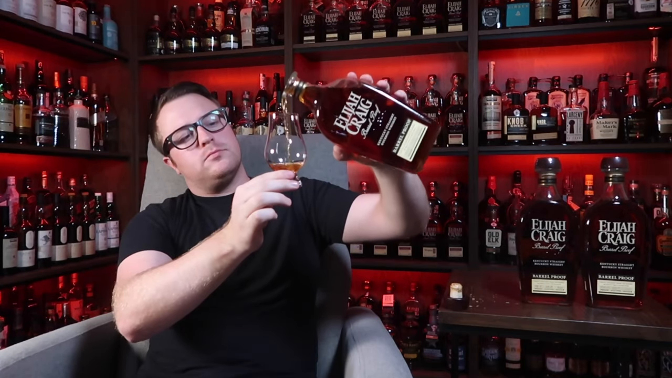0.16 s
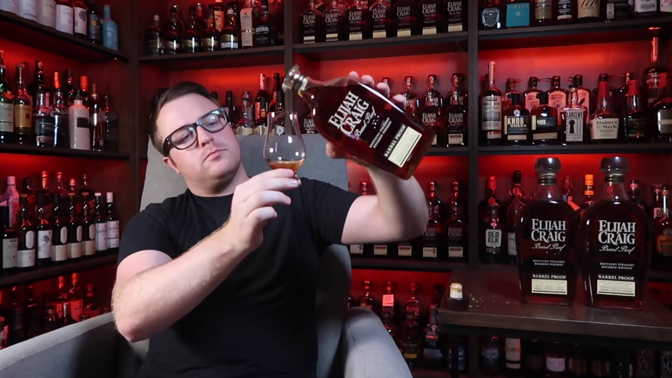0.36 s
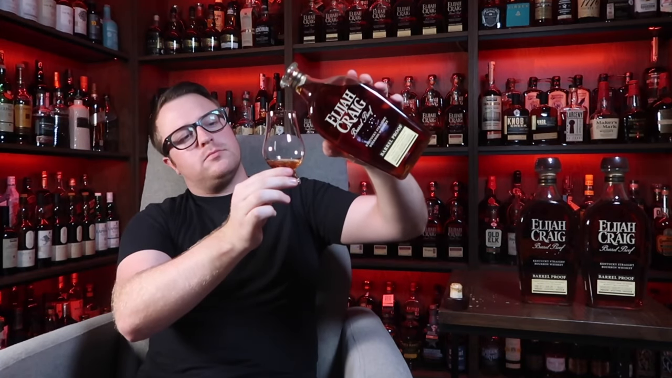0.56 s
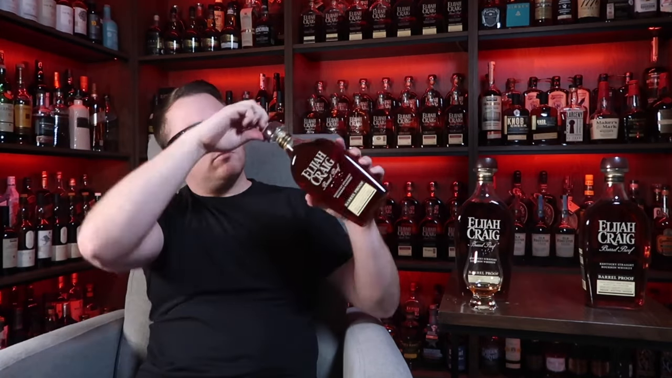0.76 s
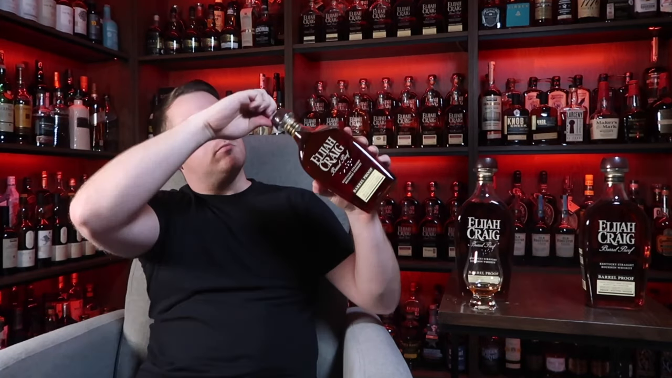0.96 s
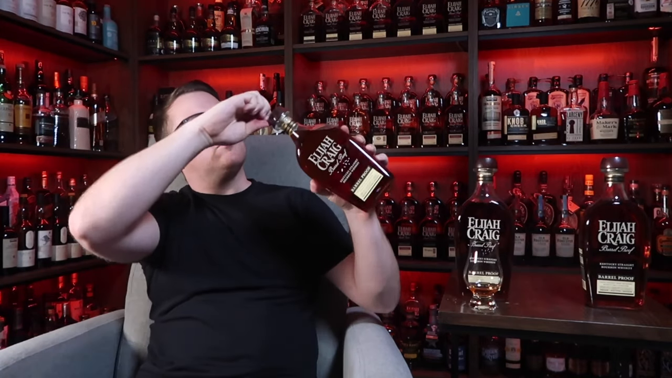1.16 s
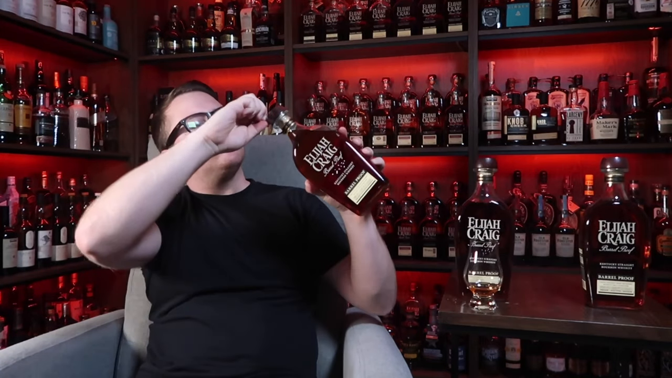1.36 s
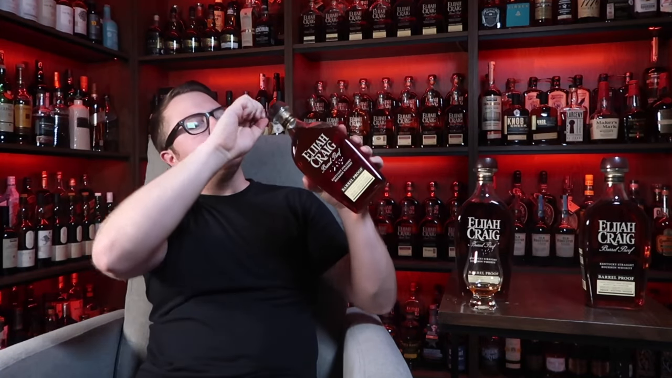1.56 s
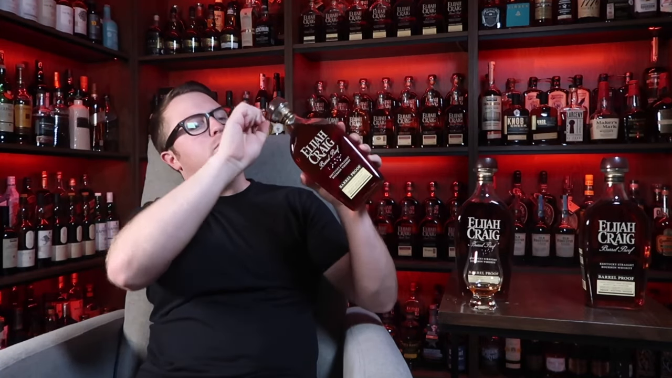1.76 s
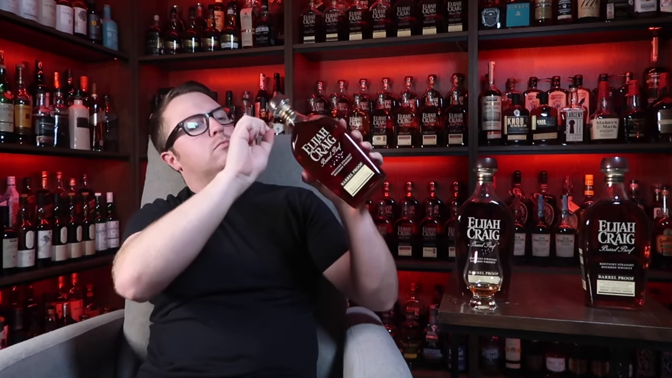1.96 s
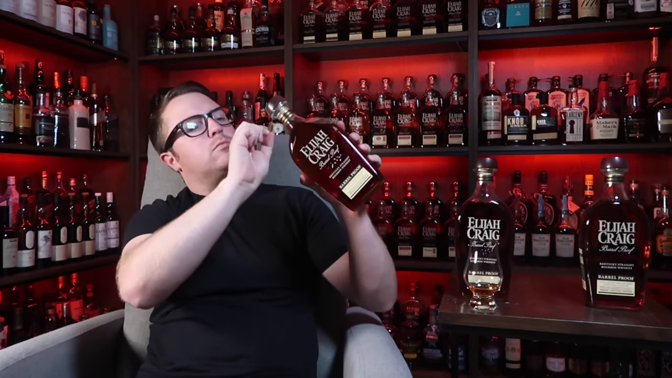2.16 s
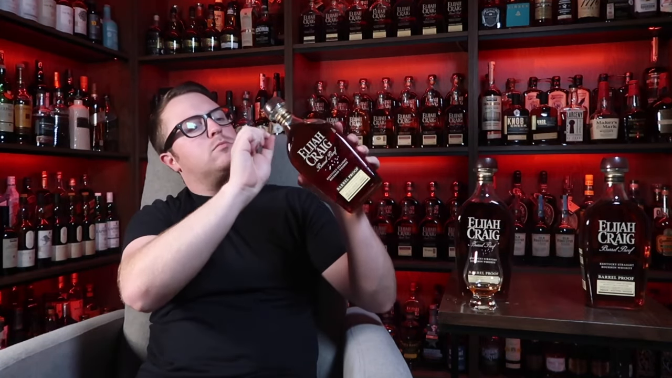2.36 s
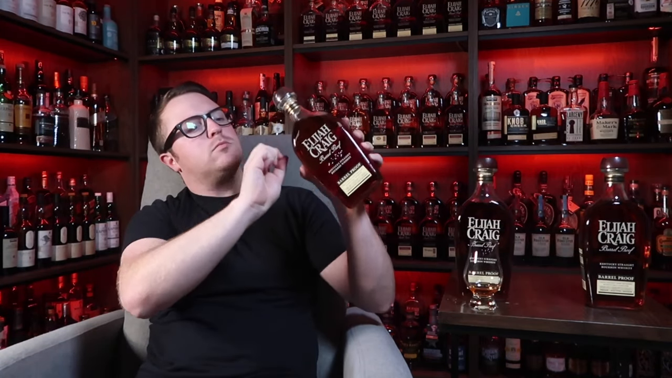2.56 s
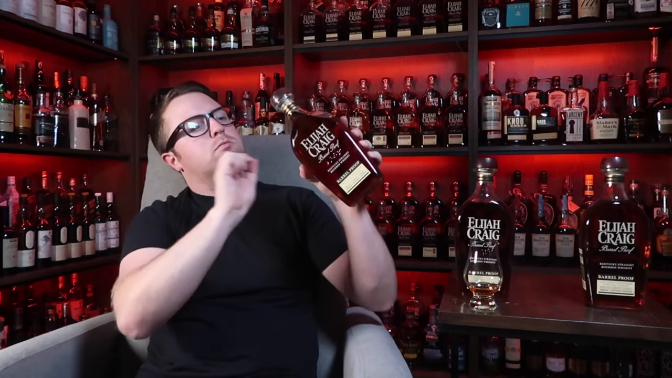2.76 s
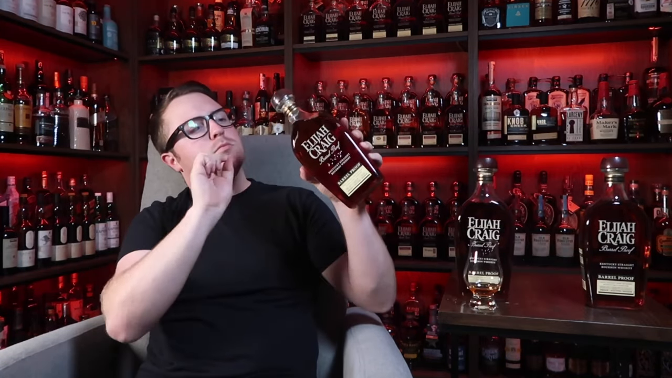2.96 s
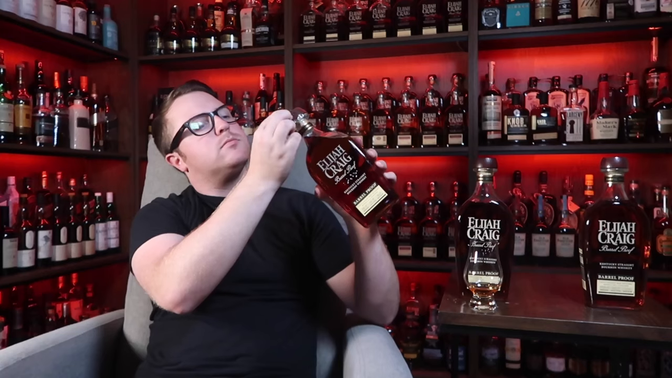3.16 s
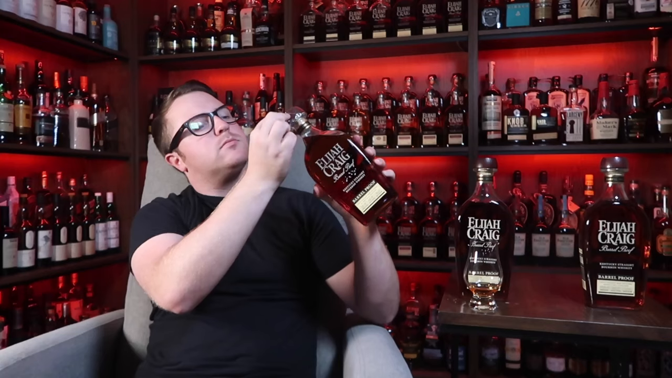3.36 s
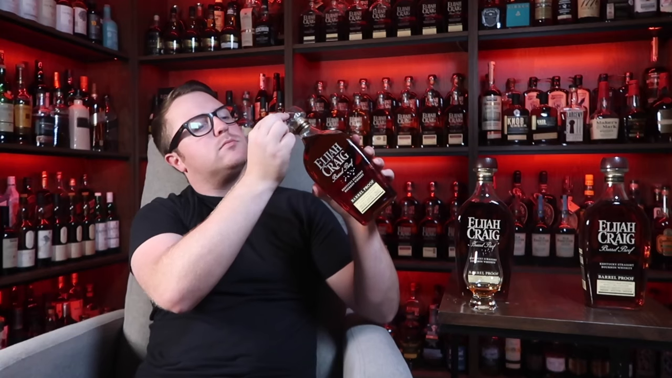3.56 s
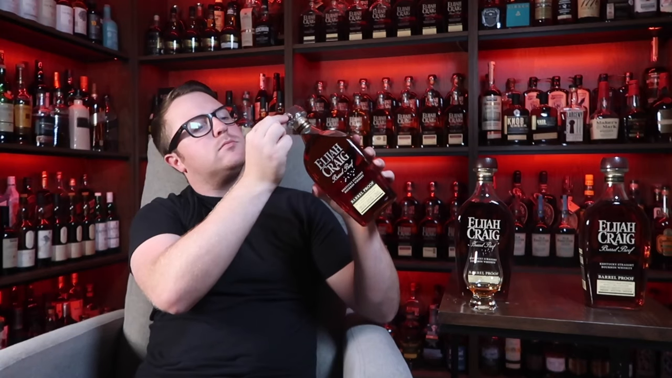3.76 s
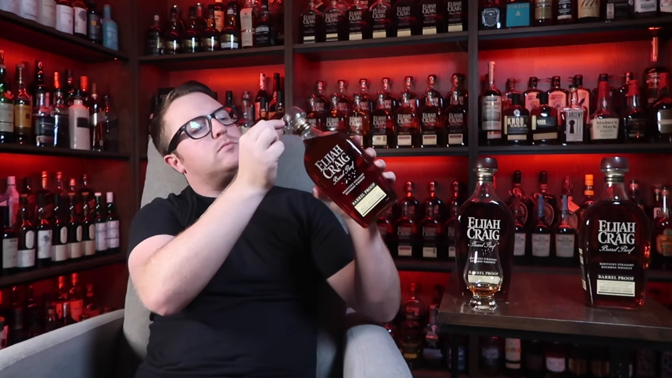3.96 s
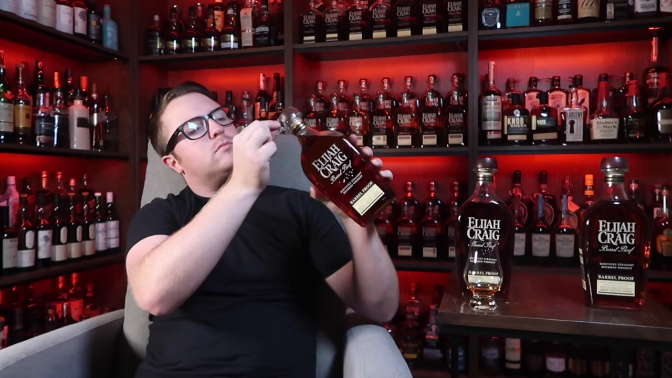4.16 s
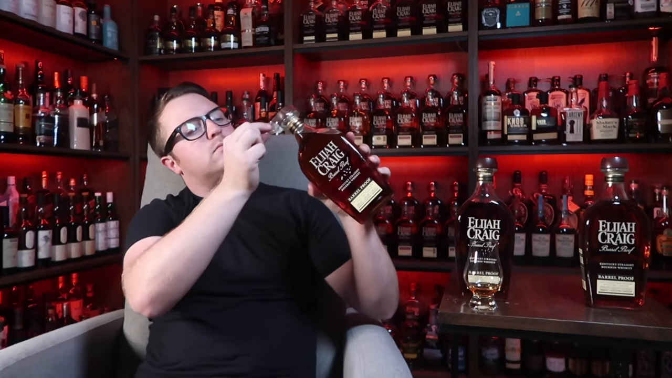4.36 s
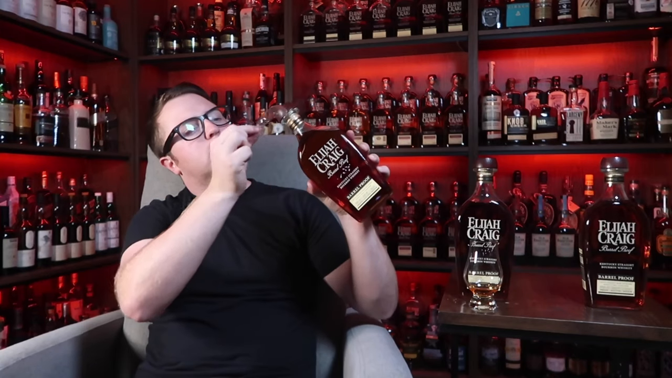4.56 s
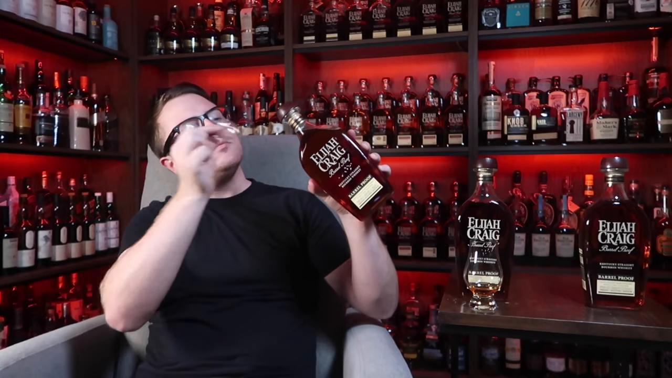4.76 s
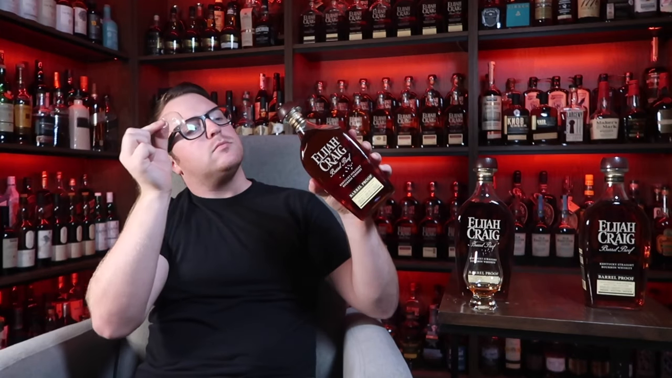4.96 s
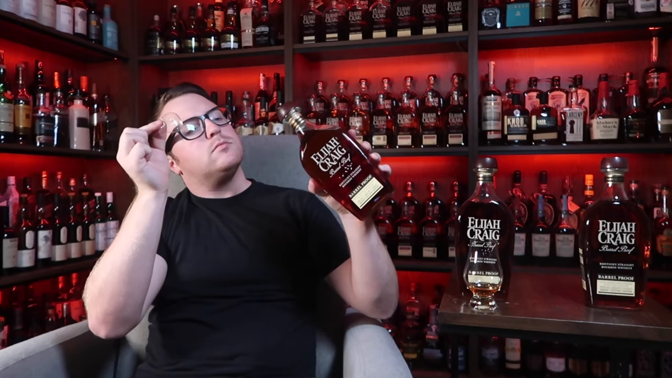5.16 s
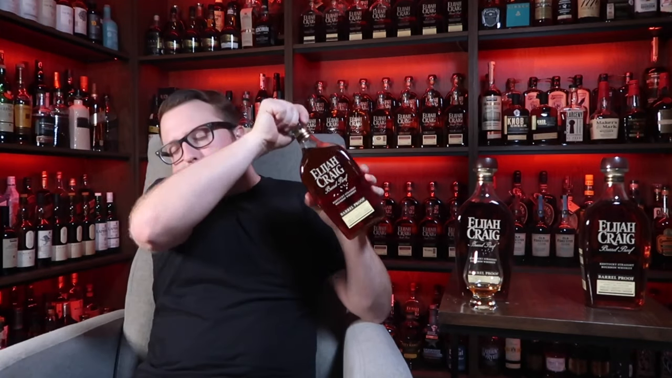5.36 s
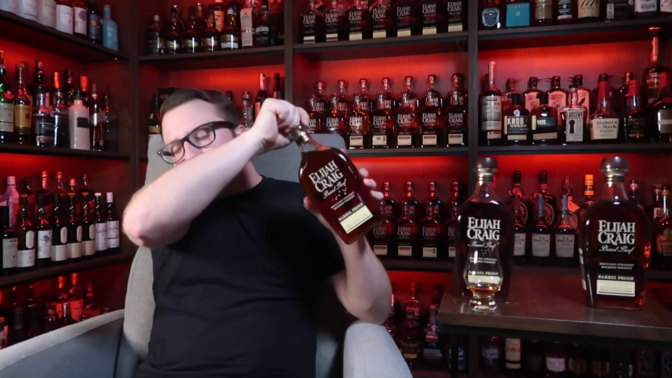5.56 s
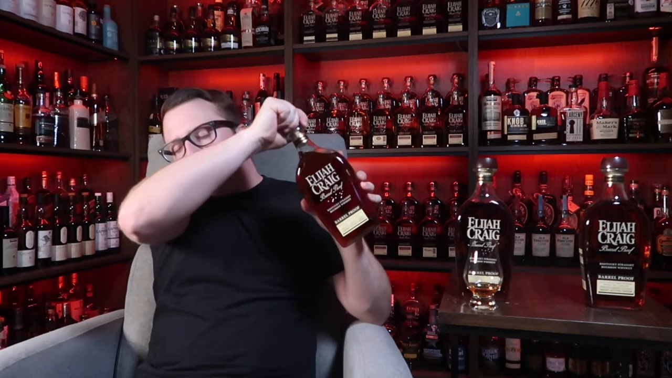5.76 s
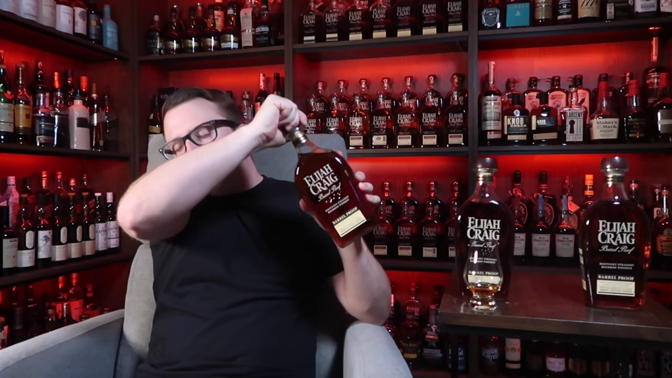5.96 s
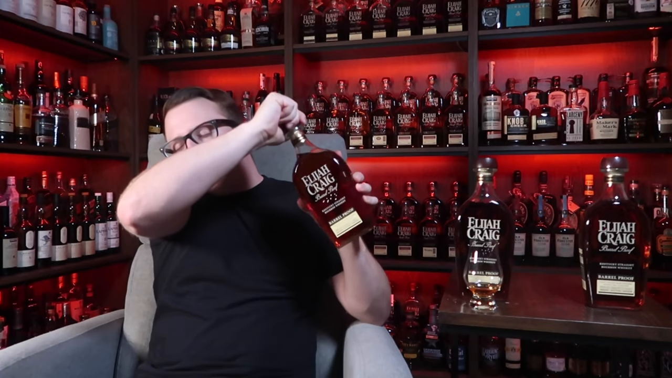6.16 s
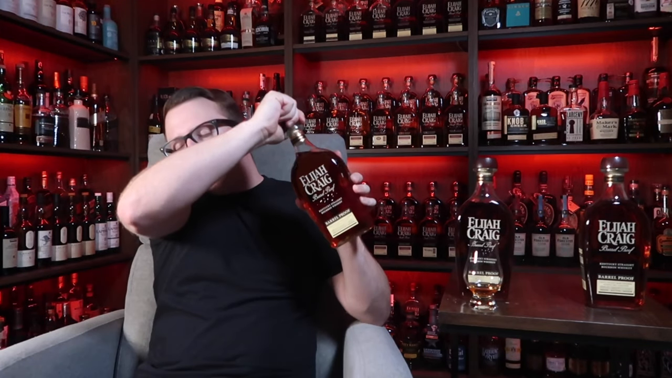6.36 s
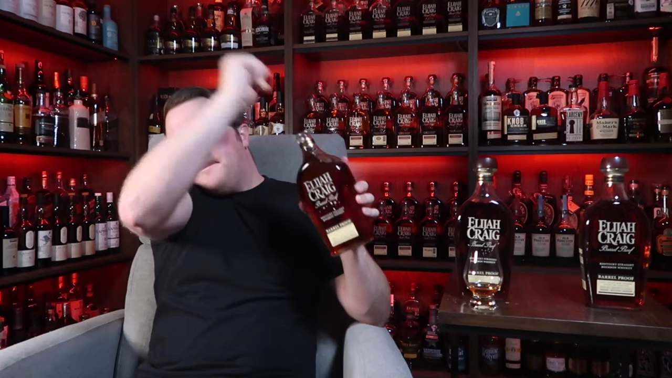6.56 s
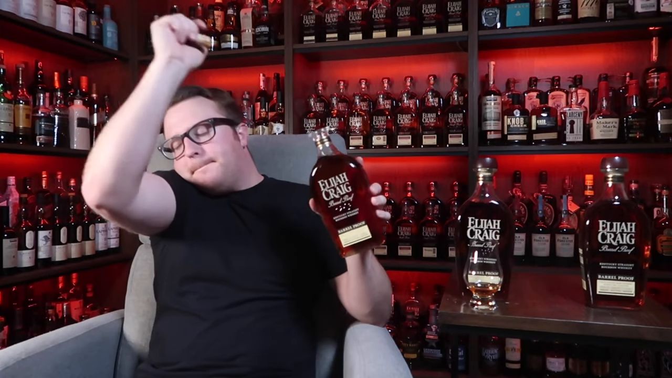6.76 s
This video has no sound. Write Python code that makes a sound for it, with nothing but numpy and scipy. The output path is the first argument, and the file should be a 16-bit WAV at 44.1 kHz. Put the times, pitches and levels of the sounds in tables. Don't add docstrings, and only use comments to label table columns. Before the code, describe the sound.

Quiet indoor close-up with low rumble and soft hiss. A thin stream ends in small glugs and bright drips. Sharp dry snaps of stiff film come in clusters, ending in a hard crack that rings the bottle. A softer seal then tears in quickening crackles. After near-silence, a cork leaves a bottle neck with one loud, round pop and a tiny glug.

```python
import sys
import numpy as np
from scipy import signal
from scipy.fft import rfft, irfft, next_fast_len
from scipy.io import wavfile

SR = 44100
rng = np.random.default_rng(int(sys.argv[2]) if len(sys.argv) > 2 else 0)


def dump(signal):
    limited = np.clip(np.atleast_2d(signal).T, -1, 1)
    pcm = np.round(limited * 32767).astype(np.int16)
    wavfile.write(sys.argv[1], SR, pcm)


def how_loud(loudness_db):
    steps = np.asarray(loudness_db, float) / 20
    return 10 ** steps


N = 299880

# [start_s, pitch_hz, level_db]
NECK_TONE = [
    (6.5651, 758, -26),
    (6.578, 824, -17),
    (6.594, 820, -23.5),
    (6.603, 800, -35.5),
    (6.65, 830, -41.5),
    (6.72, 825, -69),
    (6.8, 800, -84),
]
CORK_SLIDE_S = 0.005


def at_hz(points, hz):
    table_hz, values = np.transpose(points)
    return np.interp(np.log(np.maximum(hz, 1)), np.log(table_hz), values)


def coloured(x, *spectra):
    size = next_fast_len(len(x) + 4096)
    hz = np.arange(size // 2 + 1) * SR / size
    gain = how_loud(sum(at_hz(s, hz) for s in spectra))
    return irfft(rfft(x, size) * gain, size)[:len(x)]


def filtered(x, order, hz, kind="low"):
    return signal.sosfilt(signal.butter(order, hz, kind, fs=SR, output="sos"), x)


def rms_one(x):
    return x / np.sqrt(np.mean(x ** 2) + 1e-20)


def ring(hz, t60, glide=0.):
    t60 = max(t60, 1e-3)
    t = np.arange(int(t60 * SR) + 8) / SR
    envelope = (1 - np.exp(-5 * hz * t)) * how_loud(-60 * t / t60)
    return envelope * np.sin(2 * np.pi * hz * t * (1 + glide * t / t60))


def add(out, s, sound):
    i = max(round(s * SR), 0)
    out[i:i + len(sound)] += sound[:len(out) - i]


def in_time(rows, edge_s=.003):
    s, *columns = np.transpose(rows)
    t = np.arange(N) / SR
    window = np.interp(t, [s[0] - edge_s, s[0], s[-1], s[-1] + edge_s], [0, 1, 1, 0])
    return [np.interp(t, s, c) for c in columns], window


def grains(per_s, spread_db):
    sizes = how_loud(spread_db * np.minimum(rng.exponential(1, N), 4)) * rng.choice([-1, 1], N)
    return sizes * (rng.random(N) < per_s / SR)


def snaps():
    # [start_s, peak_db, pitch_hz]
    brittle_seal = [(0.9786, -34.4, 4020), (1.1517, -55, 5020), (1.1656, -49.2, 3640),
                    (1.1928, -45.9, 3710), (1.2299, -26.8, 3050), (1.379, -24.9, 2760),
                    (1.5903, -27.5, 2950), (1.6543, -46.6, 3500), (1.7621, -40.8, 1970),
                    (1.7964, -19.7, 2890), (1.8109, -20.5, 2920), (1.822, -27.4, 3130),
                    (1.8309, -27.7, 3450), (1.8377, -21.1, 2970), (1.8457, -27.7, 3060),
                    (1.8534, -26.1, 2150), (1.8614, -24.9, 4330), (1.8718, -28.9, 2660),
                    (1.8809, -31.2, 2850), (1.9748, -35.5, 4790), (2.3733, -32.7, 3740),
                    (2.4224, -26.1, 3730), (2.4395, -12.0, 2920), (3.0773, -36, 3900)]
    # [start_s, peak_db, pitch_hz]
    soft_seal = [(3.8373, -36.5, 4180), (3.8918, -38.0, 3380), (3.9019, -40.5, 2780), (3.9627, -23.6, 3920),
                 (4.1046, -48.3, 4850), (4.1895, -51.2, 3980), (4.2621, -39.2, 3220), (4.2867, -26.8, 3410),
                 (4.2922, -29.2, 2640), (4.3118, -22.6, 3740), (4.3463, -32.2, 2920), (4.3528, -28.9, 3330),
                 (4.358, -24.6, 3270), (4.3867, -32.4, 3900), (4.4554, -27.9, 2660), (4.4887, -28.2, 3320),
                 (4.4902, -25.5, 4090), (4.5467, -23.3, 3730), (4.572, -28.0, 4140), (4.6044, -29.3, 3750),
                 (4.6697, -28.1, 2960), (4.6821, -18.7, 3070), (4.6952, -28.0, 4030), (4.7214, -13.4, 2310),
                 (4.731, -18.5, 3110), (4.7389, -22.8, 3830), (6.7153, -50, 7400)]
    ring_cycles = [8.0, 20.2]
    # [start_s, crack_re_ring_db]
    tautness = [(.98, -12), (1.25, -18), (1.4, -18.5), (1.8, -25), (1.97, -14), (2.38, -16), (2.44, -29),
                (3.08, -10), (3.85, -43.5), (3.96, -15.5), (4.2, -18), (4.28, -30.5), (4.5, -39.5),
                (4.57, -37.5), (4.74, -19)]
    out = np.zeros(N)
    tick = np.arange(40)
    for breaks, cycles in zip([brittle_seal, soft_seal], ring_cycles):
        for s, db, hz in breaks:
            snap, crack = np.zeros((2, SR // 20))
            noise = rng.standard_normal(len(tick))
            add(crack, 0, (0.9 + noise) * how_loud(-4.5 * tick) * (-1) ** tick)
            crack = filtered(crack, 1, [2500, 12000], "band")
            add(snap, 0, ring(hz, 0.38 * cycles / hz))
            snap = filtered(snap, 2, 0.67 * hz, "high")
            snap = snap / np.abs(snap).max()
            crack_db = np.interp(s, *np.transpose(tautness)) + 31.0
            peak_s = np.abs(snap).argmax() / SR
            add(out, s - peak_s, how_loud(db - 2.0) * (snap + how_loud(crack_db) * crack))
    return out


def film_crackle():
    # [pitch_hz, level_db]
    film_colour = [(180, -33), (300, -7), (930, -4), (1100, 1), (1190, -3.5), (2070, 1.5), (3890, 8),
                   (7200, -3.5), (14700, -7), (16000, -85)]
    patch_cycles, patch_db = 12.0, -18.5
    clicks = grains(per_s=1000, spread_db=5.5)
    dealt = rng.integers(0, 10, N)
    out = clicks.copy()
    for k, hz in enumerate(np.geomspace(1700, 6000, 10)):
        r = how_loud(-60 * hz / patch_cycles / SR)
        w = 2 * np.pi * hz / SR
        struck = clicks * (dealt == k) + 1e-18
        out += how_loud(patch_db) * signal.lfilter([0, np.sin(w)], [1, -2 * r * np.cos(w), r * r], struck)
    return rms_one(coloured(out, film_colour))


def tearing():
    # [start_s, length_s, crackle_db, fade_over_pull_db, brightness_db]
    short_pulls = [
        (1.14, .095, -100, 30, 17),
        (1.773, 0.11, -62, 0.5, 18),
        (1.96, .028, -68, 13.5, -1.5),
        (2.372, .09, -77, -1.5, -5),
        (3.057, 0.042, -57, -27, 8.5),
        (3.774, .15, -63, 13, -3),
        (4.057, 0.12, -74, 2, 12),
        (6.705, 0.048, -62.5, -25.5, 7),
    ]
    # [start_s, crackle_db, brightness_db]
    long_tear = [
        (4.28, -54, -2),
        (4.336, -45, 3),
        (4.44, -47.5, -14),
        (4.55, -41.5, 7),
        (4.655, -43, -0.5),
        (4.69, -38, 5),
        (4.745, -36.5, 5.5),
        (4.8, -58, 12.5),
        (5.02, -72, -14),
    ]
    crackle = film_crackle()
    top = filtered(crackle, 2, 6000, "high")
    pulls = [[(s, db, bright), (s + length_s, db + fade_db, bright)]
             for s, length_s, db, fade_db, bright in short_pulls]
    out = np.zeros(N)
    for rows in pulls + [long_tear]:
        (db, bright_db), window = in_time(rows)
        extra_top = how_loud(np.minimum(bright_db, 18)) - 1
        out += window * how_loud(db - 6.0) * (crackle + extra_top * top)
    return out


def nail_taps():
    # [pitch_hz, level_db, t60_s]
    neck_wall = [(2218, -1, 0.077), (3400, -12, 0.014), (4260, -1, .02)]
    # [pitch_hz, level_db, t60_s]
    rim = [(2610, 0.71, 0.17)]
    # [pitch_hz, level_db, t60_s]
    cap = [(298, -25, 0.027), (475, -51, 0.028), (765, -17, 0.02), (1200, -12, 0.022), (1970, 12, 0.0029)]
    # [pitch_hz, level_db, t60_s]
    shoulder = [(1352, -6, 0.063), (1553, -4.5, 0.037), (5100, 8.5, 0.013), (5600, 1, 0.012)]
    # [start_s, wall_db, rim_db, cap_db, shoulder_db]
    knocks = [(.9785, -83, -83, -58, -71), (1.3795, -72, -53, -69, -75), (1.974, -55, -57, -79, -49.5),
              (2.373, -46.5, -57, -83, -87), (2.395, -52, -74, -71, -75), (2.422, -46, -78, -54, -75),
              (2.4393, -42, -38, -28, -68), (3.837, -58, -78, -49.5, -78), (4.358, -72, -75, -41, -74),
              (4.5477, -74, -75, -37.5, -75), (4.7214, -54, -73, -30.5, -63.5)]
    out = np.zeros(N)
    for s, *strengths_db in knocks:
        for modes, strength_db in zip([neck_wall, rim, cap, shoulder], strengths_db):
            for hz, db, t60 in modes:
                add(out, s, how_loud(strength_db + db) * ring(hz, t60))
    return filtered(out, 2, 220, "high")


def pop_tone():
    # [pitch_hz, level_db, rise_s, t60_s]
    late_ring = (538, -30, .03, .33)
    (hz, db), window = in_time(NECK_TONE, edge_s=1 / SR)
    out_s, _, first_db = NECK_TONE[0]
    cycles = np.cumsum(hz * window) / SR
    out = -window * np.sqrt(2) * how_loud(db) * np.cos(2 * np.pi * cycles)
    slide = np.linspace(0, 1, round(CORK_SLIDE_S * SR))
    suction = np.sin(1.5 * np.pi * slide) * slide ** 2
    let_go = np.argmax(window > 0)
    out[let_go - len(slide):let_go + 1] = np.sqrt(2) * how_loud(first_db) * np.append(suction, -1)
    out = filtered(out, 2, 1300)
    late_hz, late_db, rise_s, t60 = late_ring
    late = ring(late_hz, t60)
    swell = (1 - np.exp(-np.arange(len(late)) / SR / rise_s)) ** 2
    add(out, out_s, how_loud(late_db) * late * swell)
    return out


def pop_blow():
    # [pitch_hz, level_db, t60_s]
    pop_modes = [(163, -33, 0.028), (258, -19.5, 0.032), (395, -26.5, 0.039), (635, -34.5, 0.16),
                 (697, -34, 0.23), (2722, -34, 0.068), (4170, -34.5, 0.018), (5300, -65, 0.028),
                 (6800, -65, 0.013), (7700, -65, .03)]
    out = np.zeros(N)
    out_s = NECK_TONE[0][0]
    slide = np.linspace(0, 1, round(CORK_SLIDE_S * SR))
    hiss = filtered(rng.standard_normal(len(slide)), 2, [1500, 7000], "band")
    add(out, out_s - CORK_SLIDE_S, how_loud(-35.5) * hiss * np.sqrt(slide))
    for hz, db, t60 in pop_modes:
        add(out, out_s, how_loud(db) * ring(hz, t60))
    rush = filtered(rng.standard_normal(SR // 4), 3, [170, 720], "band")
    rush_db = -20.5 - 60 * np.arange(len(rush)) / SR / 0.073
    add(out, out_s - .001, how_loud(rush_db) * rush)
    return filtered(out, 2, 110, "high")


def pour():
    # [start_s, pitch_hz, level_db]
    gurgle = [
        (0.0, 765, -46.5),
        (0.03, 775, -62),
        (0.04, 784, -58),
        (0.098, 735, -50.5),
        (0.148, 786, -98),
        (0.248, 896, -69),
        (0.262, 932, -58),
        (0.336, 826, -62),
        (0.42, 799, -92),
    ]
    # [start_s, peak_db, pitch_hz]
    drops = [(0.0616, -57, 2830), (0.099, -45.5, 3120), (0.1, -62, 1300), (0.179, -49, 2940),
             (0.178, -54, 1350), (0.196, -52, 1300), (0.2, -63, 3170), (0.2338, -57, 3160),
             (0.268, -54, 3060), (0.2833, -58, 4800), (0.3365, -40.5, 2910), (0.338, -48, 1990),
             (0.106, -60, 3500), (0.0194, -59, 6530), (0.3554, -51, 3320), (0.405, -56, 2700)]
    # [start_s, peak_db, pitch_hz, t60_s]
    glugs = [
        (0.274, -53, 924, 0.032),
        (0.306, -43.5, 870, 0.02),
        (0.337, -45.5, 778, 0.037),
        (6.72, -51, 830, 0.043),
    ]
    (hz, db), window = in_time(gurgle)
    wobble = filtered(rng.standard_normal((2, N)), 2, 70) + [[.03], [0]]
    phase = 2 * np.pi * np.cumsum(hz) / SR
    resonance = wobble[0] * np.sin(phase) + wobble[1] * np.cos(phase)
    out = window * how_loud(db - 9.0) * rms_one(resonance)
    drop_t60_s = 0.011
    for s, peak_db, drop_hz, t60 in [(*drop, drop_t60_s) for drop in drops] + glugs:
        add(out, s, how_loud(peak_db - 1.0) * ring(drop_hz, t60, glide=0.075))
    return out


def fizz():
    # [start_s, level_db]
    bubbling = [
        (0.04, -83),
        (0.108, -56),
        (0.152, -75),
        (0.174, -62.5),
        (0.328, -66),
        (0.336, -48.5),
        (0.354, -64),
        (0.46, -82),
    ]
    born = grains(per_s=540, spread_db=0.0)
    dealt = rng.integers(0, 16, N)
    pitches = np.geomspace(1400, 6500, 16)
    weights = how_loud(at_hz([(1400, -27), (2200, -1.5), (3000, -2), (4500, -2), (6500, 1)], pitches))
    rings = np.zeros(SR)
    for k, (hz, weight) in enumerate(zip(pitches, weights)):
        rings += weight * signal.fftconvolve(born * (dealt == k), ring(hz, 25 / hz))[:SR]
    (db,), window = in_time(bubbling)
    return window * how_loud(db - 12.5) * np.pad(rms_one(rings), (0, N - SR))


def slosh():
    # [start_s, length_s, pitch_hz, level_db]
    hollow_notes = [
        (1.215, 0.2, 584, -74.5),
        (1.857, 0.17, 564, -76),
        (1.904, 0.17, 395, -79),
        (2.456, 0.094, 560, -67),
        (2.491, 0.3, 365, -73.5),
        (2.734, 0.26, 390.5, -71),
        (3.098, 0.16, 324, -69.5),
        (0.275, .09, 1003, -68),
    ]
    out = np.zeros(N)
    for s, length_s, hz, db in hollow_notes:
        note = filtered(rng.standard_normal(SR // 2), 2, [hz - 14, hz + 14], "band")
        size = round(length_s * SR)
        add(out, s, how_loud(db) * rms_one(note[-size:]) * np.sqrt(np.hanning(size)))
    return out


def room(dry):
    # [delay_s, mid_db, side_db]
    echoes = [
        (.0057, -7, -7),
        (.0105, -16, -4),
        (.018, -16, -10),
    ]
    # [pitch_hz, t60_s]
    room_t60 = [(125, 0.25), (500, 0.24), (2000, 0.2), (6000, 0.22), (9000, 0.19), (14000, 0.044)]
    # [start_s, room_share_db]
    facing = [(0, -3), (.98, 0.5), (1.4, -5), (1.85, 0), (1.97, 6), (2.4, 3.5), (3.07, -7.5), (3.9, -4),
              (4.3, -3.5), (4.45, -7), (4.6, -1), (6.56, -2.5), (6.72, 7)]
    # [pitch_hz, side_re_mid_db]
    ports = [(60, -42.5), (380, -50.5), (700, -21.5), (1290, -23.5), (2380, -26.5), (4400, -6.5), (8120, 3),
             (15000, 5.5)]
    tail_db, tail_rise_s = -29, 0.00078
    t = np.arange(SR // 2) / SR
    edges = 60 * 2. ** np.arange(0, 8.5, .5)
    white, answer = rng.standard_normal((2, len(t))), np.zeros((2, len(t)))
    for low, high in zip(edges, edges[1:]):
        band = filtered(np.roll(white, round(low), axis=1), 2, [low, high], "band")
        answer += band * how_loud(tail_db - 60 * t / at_hz(room_t60, np.sqrt(low * high)))
    answer *= 1 - np.exp(-(t / tail_rise_s) ** 2)
    for delay_s, mid_db, side_db in echoes:
        answer[:, round(delay_s * SR)] += how_loud([mid_db, side_db])
    (share_db,), _ = in_time(facing)
    mid, side = signal.fftconvolve((dry * how_loud(share_db))[None], answer, axes=1)[:, :N]
    direct = filtered(dry, 2, 7500)
    side = signal.hilbert(side + how_loud(-10) * direct).imag
    return mid + direct, coloured(side, ports)


def floor():
    # [pitch_hz, level_db]
    floor_mid = [(12, -53), (20, -17), (49, -1), (107, -1), (138, -2), (270, -9.5), (399, -9.5),
                 (802, -16.5), (1090, -17), (1220, -19), (2320, -21), (11400, -36), (16000, -73)]
    # [pitch_hz, side_re_mid_db]
    floor_side = [(60, -32), (110, -17.5), (200, -4), (380, 1.5), (700, 0.5), (1290, 3), (2380, 2),
                  (4400, 3), (8120, 1), (15000, 5)]
    mid, side = rng.standard_normal((2, N))
    mid = coloured(mid, floor_mid)
    side = coloured(side, floor_mid, floor_side)
    return how_loud(-67) * np.array([mid, side]) / np.std(mid)


def scene():
    # [pitch_hz, level_db]
    mid_colour = [(4000, 0), (6000, 0), (9000, -3), (12000, -7), (16000, -12)]
    sources = snaps() + tearing() + nail_taps() + pop_blow() + pour() + fizz() + slosh()
    mid, side = room(coloured(sources, mid_colour)) + floor()
    mid = mid + pop_tone()
    return np.array([(mid + side) * how_loud(1.16), (mid - side) * how_loud(0.96)])


def low_pass(x):
    return signal.sosfilt(signal.butter(12, 16480, fs=SR, output="sos"), x)


def record(dry):
    # [start_s, half_length_s]
    joins = [
        (0.762, 0.032),
        (3.029, 0.025),
        (5.396, 0.032),
    ]
    t, gain = np.arange(N) / SR, np.ones(N)
    for s, half_s in joins:
        gain *= np.clip(np.abs(t - s) / half_s, .05, 1) ** 1.03
    return low_pass(dry * gain)


dry = scene()
out = record(dry)
dump(out)
```